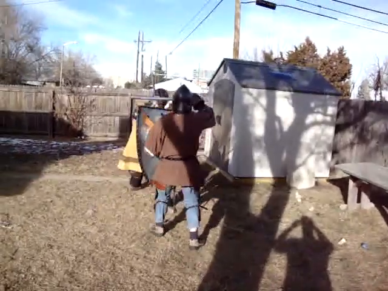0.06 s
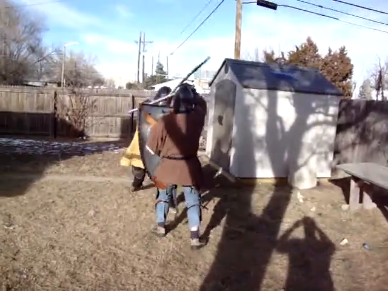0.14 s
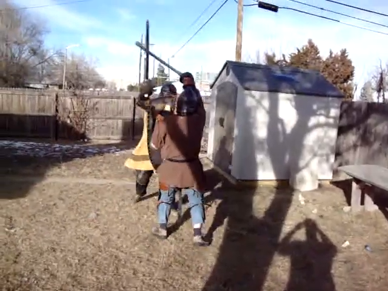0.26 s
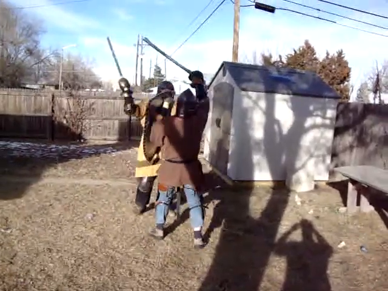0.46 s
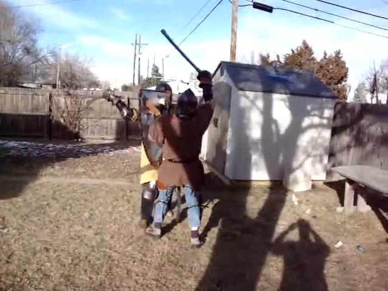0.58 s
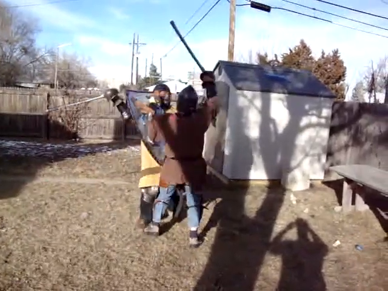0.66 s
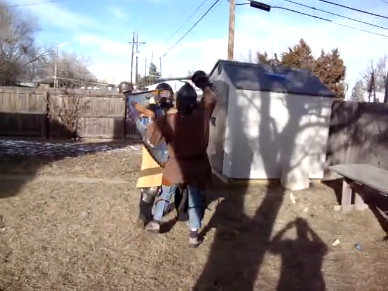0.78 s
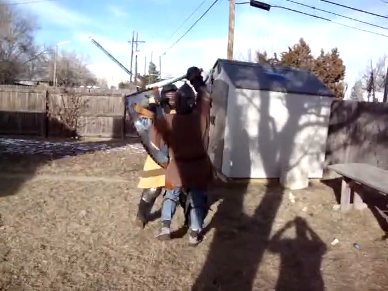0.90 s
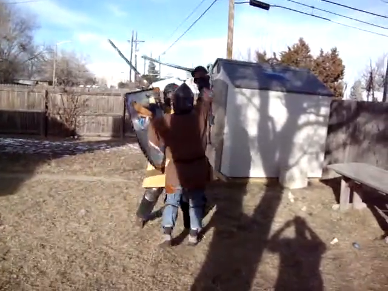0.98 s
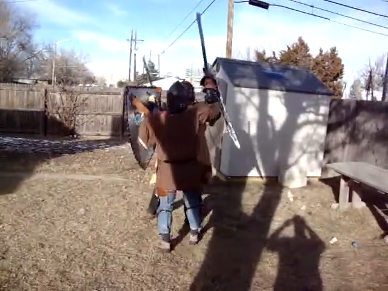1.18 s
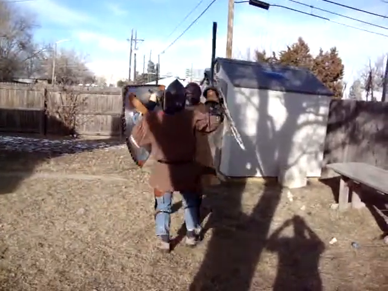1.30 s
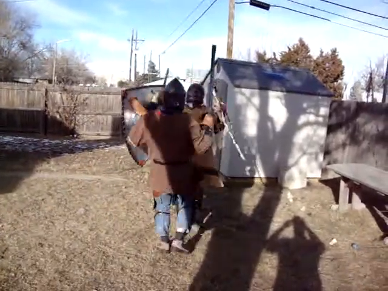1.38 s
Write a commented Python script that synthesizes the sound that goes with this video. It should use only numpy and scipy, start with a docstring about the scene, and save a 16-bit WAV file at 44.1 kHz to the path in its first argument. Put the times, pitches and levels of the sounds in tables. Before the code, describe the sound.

Padded sticks crack and thud on shields a few metres away, two quick blows and then two more. Steel armour clatters with each hit and clinks between them, while feet scuff on dry grass in a slightly echoing yard.

```python
"""Two armoured fighters trade blows in a fenced yard, a few metres away.
At first feet scuff on dry grass and armour rattles over an outdoor hush and a fading rumble.
Near 0.22 s and 0.36 s padded sticks crack on shields: each impact sets the damped board thudding and
jolts the steel plates into a clatter, and a shed wall and the fence reflect the sound.
Steps keep the armour clinking until two more blows, near 0.87 s and 1.06 s; a faint rattle comes last."""
import sys
import numpy as np
from scipy import signal
from scipy.fft import rfft, irfft, next_fast_len
from scipy.io import wavfile
from scipy.ndimage import uniform_filter1d

SR = 44100
rng = np.random.default_rng(int(sys.argv[2]) if len(sys.argv) > 2 else 0)


def to_wav(sig):
    """Store sig (one row per channel, or 1-D mono) as 16-bit WAV at the path in sys.argv[1].

    Samples outside -1..1 are clipped; the rate is SR.
    """
    pcm = np.clip(np.atleast_2d(sig), -1, 1) * 32767
    pcm = np.round(pcm).astype(np.int16)
    wavfile.write(sys.argv[1], SR, pcm.T)  # frames by channels


N = 63945

# Spectra of the distant hush, the rumble and the crushed grass: frequency_hz, relative_db
HUSH_SPECTRUM = [(25, -27), (100, -32), (300, -14.5), (500, -1), (750, 1.5), (1300, 1), (2800, -16.5),
                 (6000, -10), (10000, -18)]
RUMBLE_SPECTRUM = [(25, -30), (70, -13.5), (125, -0.5), (200, 5), (400, -2), (900, -43)]
GRASS_SPECTRUM = [(100, -28.5), (300, -6.5), (800, 9), (1600, -2), (3000, -4), (7000, -41), (10000, -27)]
# Envelopes of the rumble and of the feet and cloth: time_s, level_db
RUMBLE_ENVELOPE = [(0, -49), (.25, -48), (.5, -62), (.8, -59.5), (1.45, -65.5)]
SCUFF_ENVELOPE = [(0, -47), (.1, -43), (.45, -46.5), (.8, -42.5), (1.15, -45), (1.3, -50.5), (1.45, -49.5)]

# Reflections from shed and fence: delay_s, relative_db
REFLECTIONS = [(.0185, -20.5), (.026, -20.5), (0.037, -26), (0.063, -14.5)]
# Reverberation time of the yard: frequency_hz, t60_s
YARD_DECAY = [(150, 0.93), (700, 0.31), (2500, 0.54), (6000, 0.58), (10000, 0.37)]
# Colouring of all reflected sound: frequency_hz, gain_db
YARD_SPECTRUM = [(100, -10), (300, 0), (600, -2.5), (900, 4.5), (2000, 0.5), (5000, -3.5), (10000, -7.5)]

# Jolts of the armour, the last three columns relative to level_db:
# start_s, level_db, hold_s, t60_s, body_db, jingle_db, ring_db
ARMOUR_JOLTS = [(0.034, -30.5, 0.0053, 0.069, -3.5, -2.5, -1.5), (0.061, -43, 0.037, 0.13, 9.5, 4.5, -6.5),
                (0.13, -42, 0.0069, .07, -6, 2.5, -33.5), (.147, -34, 0.009, .09, -4.5, 3.5, -25),
                (0.171, -40, 0.011, 0.038, 5, -9, -1), (0.2177, -21, 0.0094, .08, 1.5, 2, -16),
                (0.2378, -17.5, 0.0092, 0.031, 3.5, -2, -8.5), (0.2503, -16.5, 0.0042, 0.076, 4, 3, -7),
                (0.27, -21.5, 0.015, 0.17, 5.5, 6, -11.5), (0.354, -21.5, 0.0048, 0.054, 8, -4.5, -19),
                (0.375, -28, 0.0097, 0.059, -5, 3.5, -18), (0.411, -38.5, 0.047, 0.28, -1, 2, -9),
                (0.506, -44, .004, 0.01, -20, 18, -6), (0.519, -29.5, 0.002, 0.028, -18, 3, -1),
                (0.545, -30.5, 0.0025, 0.12, -16, 6, -2), (0.596, -39.5, 0.019, 0.033, 2.5, 2.5, -12),
                (0.659, -24.5, 0.0048, 0.14, -3, 11, -16), (0.673, -29, 0.014, 0.17, -1.5, 7, -4),
                (0.7519, -31, 0.0072, 0.057, 1.5, 8.5, 3), (0.8202, -52, 0.0034, 0.0051, 4, 32.5, -7),
                (0.8278, -24.5, 0.015, 0.071, -7.5, -0.5, -3.5),
                (0.849, -24, 0.0068, 0.11, -16, -14, -10.5), (0.8695, -19, 0.029, 0.13, -1.5, -0.5, -5.5),
                (0.923, -26.5, 0.0097, 0.18, -1, 8, -33), (1.0559, -24, 0.014, 0.011, -6.5, 4.5, -26),
                (1.068, -27, 0.011, 0.2, 1, -12, -17), (1.1252, -26.5, 0.0035, 0.092, 2, 8, -8),
                (1.138, -26.5, 0.017, 0.041, -2.5, -21, -19), (1.159, -32.5, 0.014, 0.11, 1.5, 2, -7.5),
                (1.404, -38, 0.0048, 0.085, 4.5, -7, -13), (1.426, -47, 0.027, 0.3, 1, -11.5, -30)]
# Spectra of a clatter's low, middle and high parts: frequency_hz, relative_db
BODY_SPECTRUM = [(20, -60), (60, -36), (130, -31.5), (220, -20.5), (310, -11), (430, -12.5), (660, 0),
                 (850, -4), (1200, -10), (2200, -42.5), (6000, -71)]
PLATE_SPECTRUM = [(60, -50), (300, -40.5), (800, -6), (1200, -1), (1600, -3), (2600, 0), (3400, -3),
                  (5000, -9.5), (10000, -35)]
JINGLE_SPECTRUM = [(200, -68.5), (1500, -26.5), (3000, -7), (4200, 3.5), (5800, 5), (7800, -0.5),
                   (9000, -3), (10200, -8)]
# Single plates and buckles that ring on: start_s, level_db, pitch_hz, t60_s
STEEL_CLINKS = [(.037, -38.5, 6170, 0.38), (.237, -16, 7630, 0.091), (0.359, -22.5, 5690, 0.057),
                (.521, -40, 4960, 0.052), (.432, -35, 5280, 0.11), (0.501, -31.5, 3220, .08),
                (.547, -26.5, 4830, 0.065), (0.549, -23.5, 4630, 0.055), (.662, -34, 4334, .48),
                (.662, -38, 2864, .35), (.662, -31, 895, .12), (0.661, -24.5, 7140, .16),
                (.752, -28.5, 3750, 0.079), (.831, -27, 8950, 0.068), (0.832, -50, 4750, 0.11)]

# Shield boards and padding pushed in: start_s, level_db, pitch_hz, t60_s, flex_mode_db
SHIELD_THUDS = [(.2205, -21.5, 890, 0.048, -1), (.2528, -14.5, 840, 0.026, -11),
                (.2775, -17.5, 629, 0.061, -7.5), (.3592, -11, 560, 0.027, -46),
                (.379, -13.5, 730, 0.021, -37), (.418, -30, 688, 0.05, -13), (.483, -27.5, 540, 0.02, -8),
                (.9150, -3.5, 630, 0.016, -16), (1.0575, -15.5, 737, 0.022, -3.5),
                (1.075, -25.5, 750, 0.019, 4), (1.128, -21, 667, 0.032, -6)]
# Modes of a shield board: pitch_ratio, relative_db
BOARD_MODES = [(.84, -29), (0.998, 4), (1.399, -12.5)]
# Stick contacts and their relative push of air: start_s, level_db, pitch_hz, t60_s, push_db
STICK_CRACKS = [(0.2194, -2, 1574, 0.0052, -26), (0.2389, -13, 2580, .005, -50),
                (0.3564, -6, 2120, .005, -51.5), (.3589, 0, 2290, 0.0034, -49),
                (.3611, -7, 1481, 0.0061, -39), (.8680, 5.5, 2250, 0.0026, -38),
                (0.8708, -1, 1947, 0.0043, -47), (1.0590, -6.5, 3510, 0.0058, -55),
                (1.063, -7, 2510, 0.0033, -63)]


def amp(db):
    """Amplitude grows tenfold for every 20 dB."""
    return 10 ** (np.asarray(db) / 20)


def unit_rms(x):
    """Normalisation to unit mean power."""
    return x / np.sqrt(np.mean(x ** 2) + 1e-20)


def at_frequency(points, hz):
    """Interpolation on a logarithmic frequency axis."""
    knots_hz, values = np.transpose(points)
    return np.interp(np.log(hz + 1), np.log(knots_hz + 1), values)


def since(start_s):
    """Causal time: seconds since the start, zero before it."""
    return np.maximum(np.arange(N) / SR - start_s, 0)


def decay(t, t60_s):
    """Exponential damping: 60 dB lost in t60_s."""
    return np.exp(-np.log(1000) * t / t60_s)


def rise(t, time_constant_s):
    """First-order approach to full amplitude."""
    return 1 - np.exp(-t / time_constant_s)


def contour(points):
    """An amplitude envelope, interpolated in decibels."""
    return amp(np.interp(since(0), *np.transpose(points)))


def coloured(x, spectrum, size=4096):
    """Spectral shaping by a minimum-phase filter of unit energy."""
    gain = amp(at_frequency(spectrum, np.fft.rfftfreq(size, 1 / SR)))
    cepstrum = irfft(np.log(gain))
    cepstrum[1:size // 2] *= 2  # folding onto positive time makes the filter causal
    cepstrum[size // 2 + 1:] = 0
    response = irfft(np.exp(rfft(cepstrum)))
    return signal.fftconvolve(x, response / np.linalg.norm(response))[:N]


def contacts(per_s, spread_db):
    """Shot noise: tiny independent impacts of uneven size, at unit rms."""
    signed_hits = (rng.random(N) < per_s / SR) * rng.choice([-1, 1], N)
    return unit_rms(signed_hits * amp(spread_db * rng.standard_normal(N)))


def radiated(displacement, hz):
    """Radiation follows surface velocity, here scaled to about unit gain at hz."""
    return np.gradient(displacement) * SR / (2 * np.pi * hz)


def outdoors(hush_db=-51.5):
    """Filtered random noise gives a steady hush and a low rumble that dies away."""
    hush, rumble = rng.standard_normal((2, N))
    return (amp(hush_db) * coloured(hush, HUSH_SPECTRUM)
            + contour(RUMBLE_ENVELOPE) * coloured(rumble, RUMBLE_SPECTRUM))


def scuffle():
    """Many small contacts in dry grass and cloth merge into a crunch as the fighters shift."""
    return contour(SCUFF_ENVELOPE) * coloured(contacts(per_s=2300, spread_db=5), GRASS_SPECTRUM)


def yard_echoes(x, tail_db=-11.5, build_s=0.012, smear_t60_s=0.0051):
    """Diffuse reflection: rough walls return a few smeared echoes, then a thin reverberant tail."""
    hz, t, bands = signal.stft(rng.standard_normal(N), SR, nperseg=256)
    bands = bands * decay(t, at_frequency(YARD_DECAY, hz)[:, None])
    tail = signal.istft(bands, SR, nperseg=256)[1][:N] * rise(since(0), build_s)
    response = amp(tail_db) * tail / np.linalg.norm(tail)
    for delay_s, relative_db in REFLECTIONS:
        age = since(delay_s)
        echo = (age > 0) * decay(age, smear_t60_s) * rng.standard_normal(N)
        response += amp(relative_db) * echo / np.linalg.norm(echo)
    colour = amp(at_frequency(YARD_SPECTRUM, np.fft.rfftfreq(N, 1 / SR)))
    response = irfft(rfft(response) * colour, N)
    return signal.fftconvolve(x, response[:SR])[:N]


def steel_ring(modes=28, low_hz=999, high_hz=9436, t60_s=0.062, scatter_db=6.5):
    """Modal superposition: the tones of randomly shaken plates form a response of unit energy."""
    t = since(0)[:SR // 4]
    nominal_hz = np.linspace(np.sqrt(low_hz), np.sqrt(high_hz), modes)[:, None] ** 2
    hz = nominal_hz * np.exp(rng.normal(0, 0.027, (modes, 1)))
    weights = amp(scatter_db * rng.standard_normal((modes, 1))) * rng.choice([-1, 1], (modes, 1))
    ring = np.sum(weights * np.cos(2 * np.pi * hz * t), axis=0) * decay(t, t60_s)
    return ring / np.linalg.norm(ring)


def armour_clatter(per_s=4800, spread_db=3, rise_s=0.00098):
    """Impact excitation: each jolt starts a burst of plate collisions that knock, jingle and ring."""
    body, plates, jingle, ring = np.zeros((4, N))
    for start_s, level_db, hold_s, t60_s, body_db, jingle_db, ring_db in ARMOUR_JOLTS:
        envelope = amp(level_db) * rise(since(start_s), rise_s) * decay(since(start_s + hold_s), t60_s)
        hits = envelope * contacts(per_s, spread_db)
        plates += hits
        body += amp(body_db) * envelope * contacts(per_s, spread_db)
        jingle += amp(jingle_db) * envelope * contacts(per_s, spread_db)
        ring += amp(ring_db) * signal.fftconvolve(hits, steel_ring())[:N]
    return (amp(-6.5) * coloured(body, BODY_SPECTRUM)
            + amp(-2) * coloured(plates, PLATE_SPECTRUM)
            + amp(-7) * coloured(jingle, JINGLE_SPECTRUM) + ring)


def armour_clinks(waver_rad=0.39, swell_s=0.003):
    """Free vibration: a loose piece of steel rings on, its phase modulated as it chatters."""
    out = np.zeros(N)
    for start_s, level_db, pitch_hz, t60_s in STEEL_CLINKS:
        t = since(start_s)
        chatter = waver_rad * unit_rms(uniform_filter1d(rng.standard_normal(N), size=200))
        tone = np.sin(2 * np.pi * pitch_hz * t + chatter)
        out += amp(level_db) * tone * decay(t, t60_s) * rise(t, swell_s)
    return out


def shield_thuds(contact_s=0.001, flex_ratio=0.599):
    """Heavy damping stops a struck board's modes quickly, so they are heard as a dull thud."""
    out = np.zeros(N)
    for start_s, level_db, pitch_hz, t60_s, flex_mode_db in SHIELD_THUDS:
        t = since(start_s)
        phase = 2 * np.pi * pitch_hz * t
        modes = sum(amp(db) / ratio * np.sin(ratio * phase) for ratio, db in BOARD_MODES)
        flex = amp(flex_mode_db) / flex_ratio * np.sin(flex_ratio * phase)  # the lowest mode
        displacement = (flex - modes) * decay(t, t60_s) * rise(t, contact_s)
        out += amp(level_db) * radiated(displacement, pitch_hz)
    return out


def stick_cracks(contact_s=0.00022, push_s=0.0016):
    """A brief impact excites a crack of a few cycles and displaces air in one low swing."""
    out = np.zeros(N)
    for start_s, level_db, pitch_hz, t60_s, push_db in STICK_CRACKS:
        t = since(start_s)
        displacement = np.sin(2 * np.pi * pitch_hz * t) * decay(t, t60_s) * rise(t, contact_s)
        air_push = (t > 0) * (1 - t / push_s) * np.exp(-t / push_s)
        out += amp(level_db) * (radiated(displacement, pitch_hz) + amp(push_db) * air_push)
    return out


def scene():
    """Superposition of the direct sound, its reflections and the background in one channel."""
    cracks, thuds = stick_cracks(), shield_thuds()
    metal = armour_clatter() + armour_clinks()
    echoes = yard_echoes(amp(-5) * cracks + thuds + metal)  # the sticks excite the yard less
    return (cracks + thuds + metal + echoes + scuffle() + outdoors())[None]


def record(dry, cutoff_hz=10150):
    """Band limiting: an ideal low-pass filter passes nothing above the cutoff."""
    size = next_fast_len(N + SR // 2)
    passband = np.fft.rfftfreq(size, 1 / SR) < cutoff_hz
    return irfft(rfft(dry, size) * passband, size)[..., :N]


dry = scene()
out = record(dry)
to_wav(out)
```